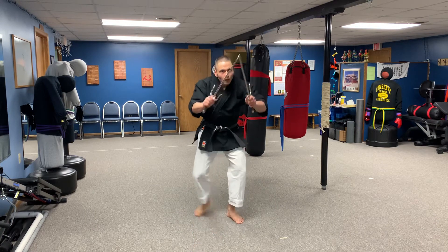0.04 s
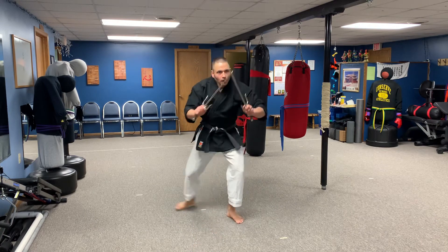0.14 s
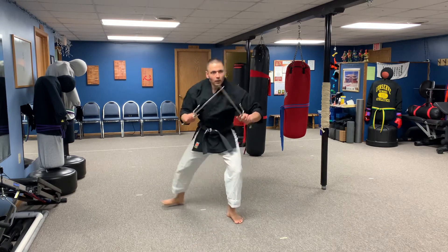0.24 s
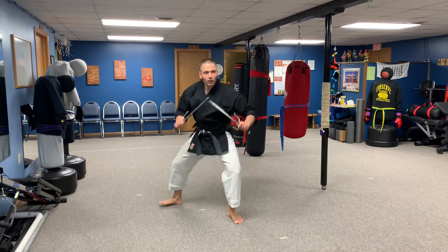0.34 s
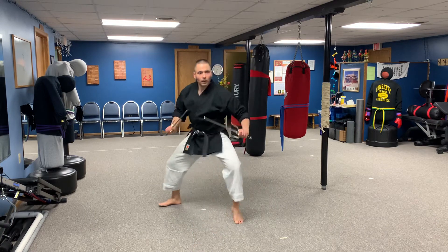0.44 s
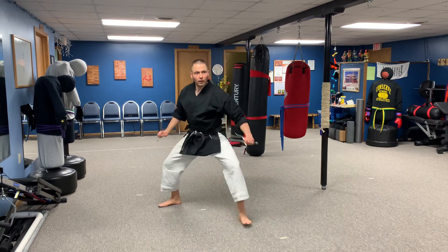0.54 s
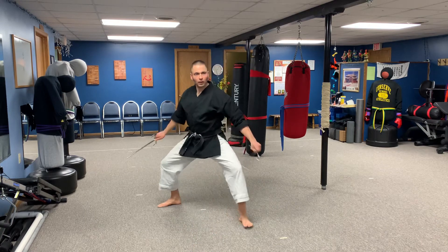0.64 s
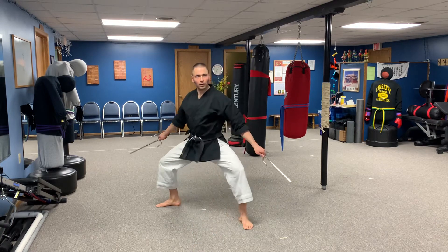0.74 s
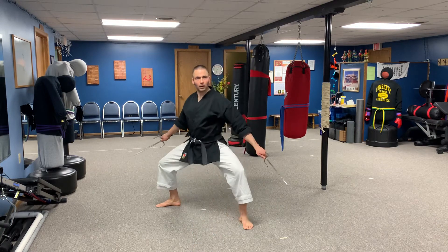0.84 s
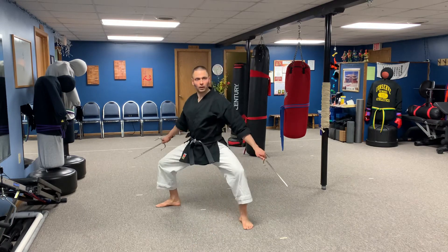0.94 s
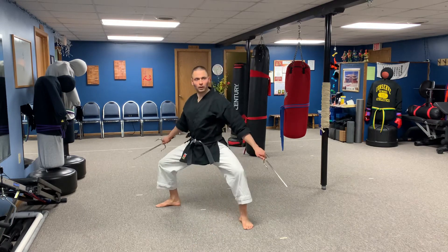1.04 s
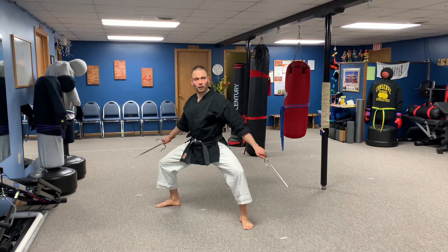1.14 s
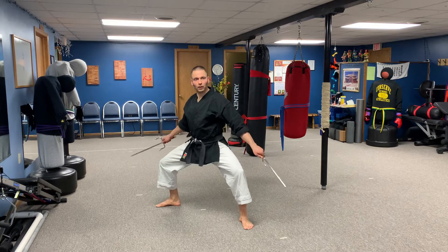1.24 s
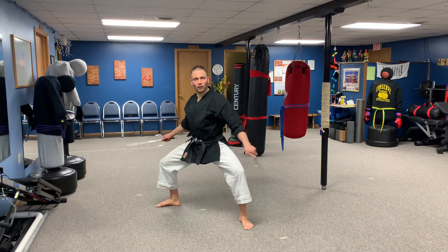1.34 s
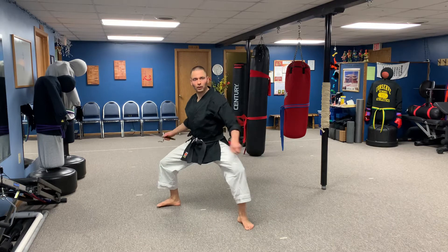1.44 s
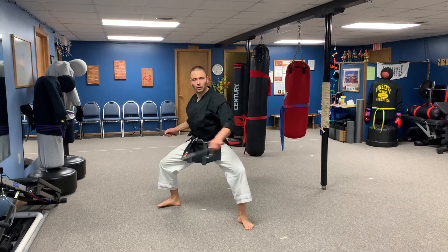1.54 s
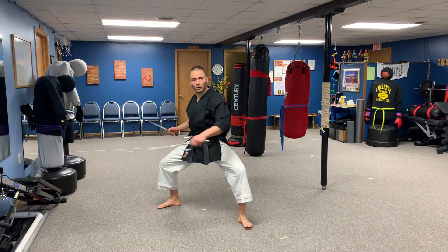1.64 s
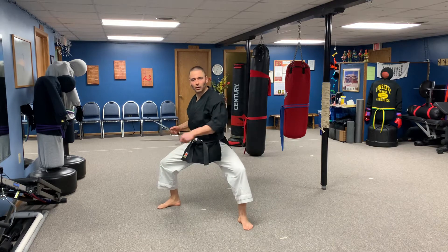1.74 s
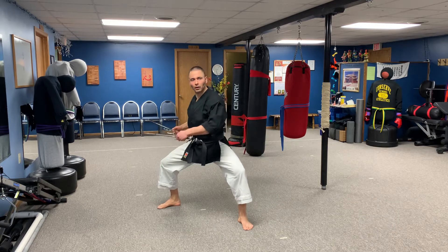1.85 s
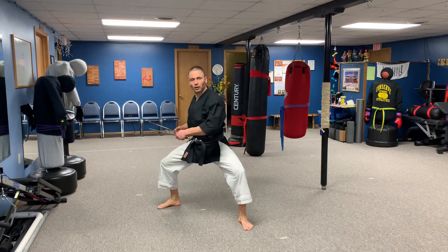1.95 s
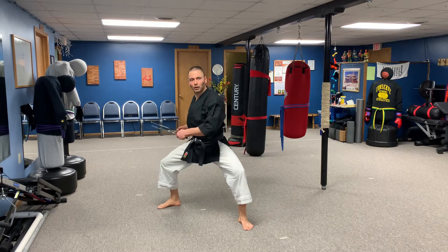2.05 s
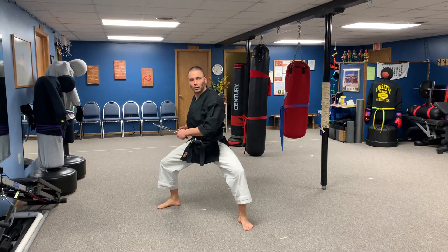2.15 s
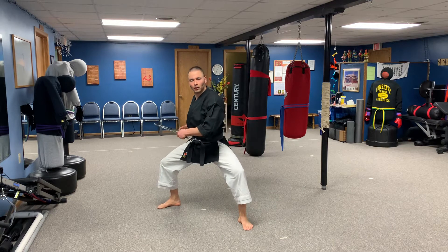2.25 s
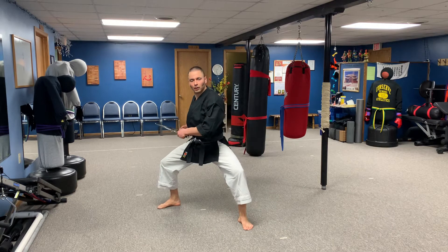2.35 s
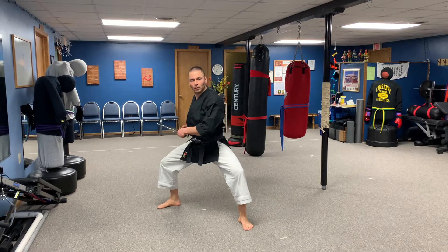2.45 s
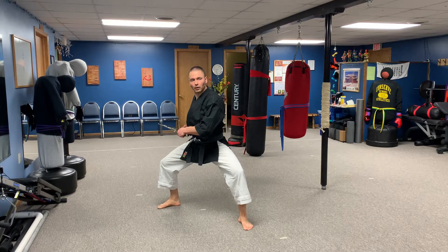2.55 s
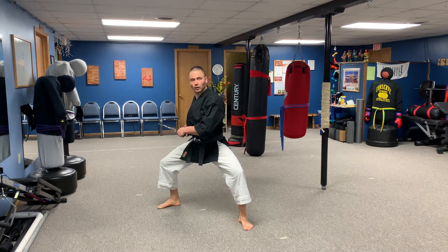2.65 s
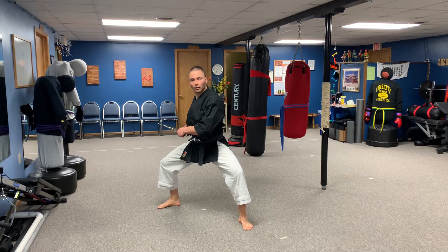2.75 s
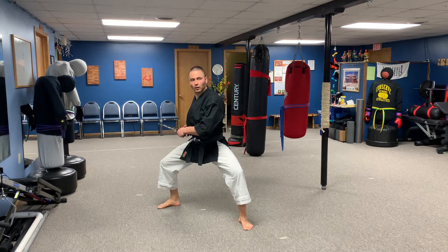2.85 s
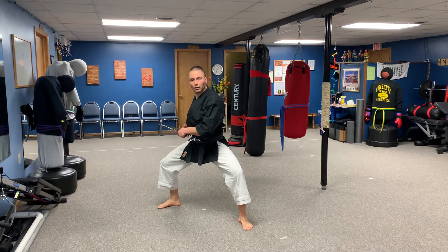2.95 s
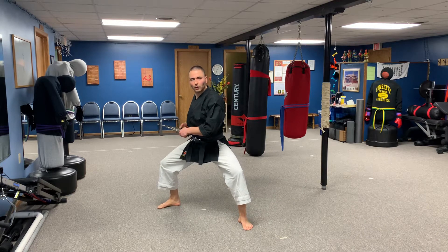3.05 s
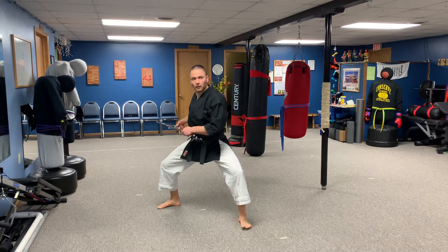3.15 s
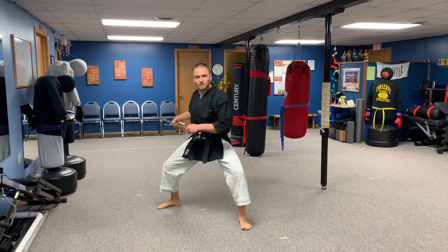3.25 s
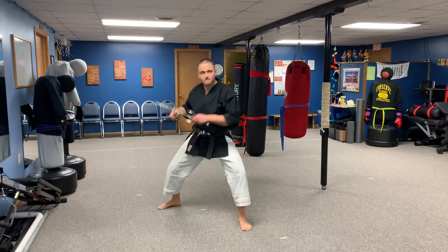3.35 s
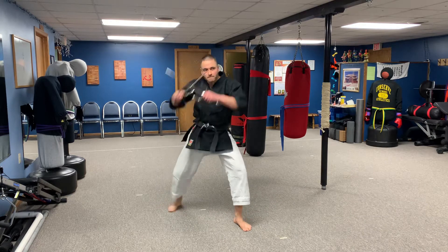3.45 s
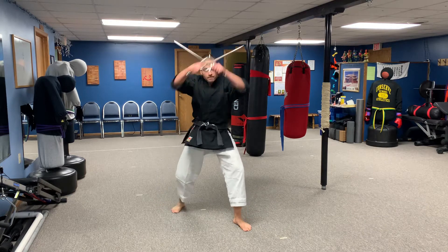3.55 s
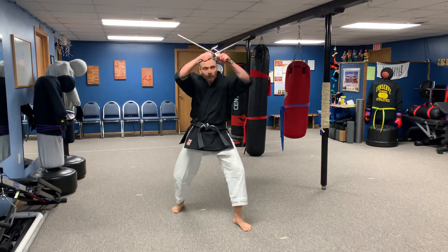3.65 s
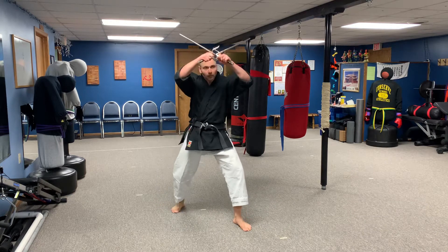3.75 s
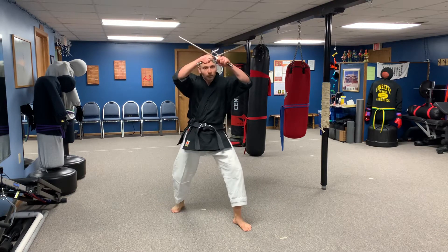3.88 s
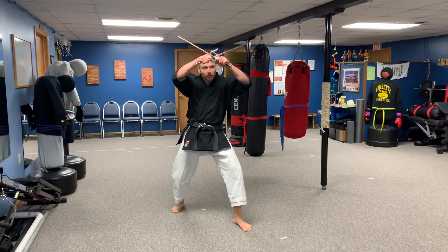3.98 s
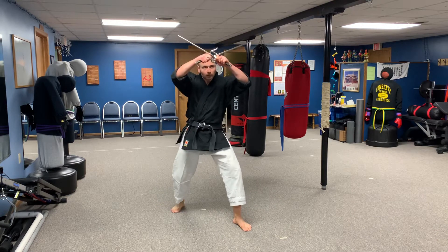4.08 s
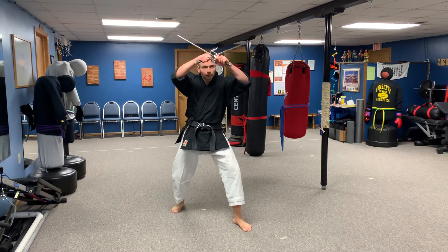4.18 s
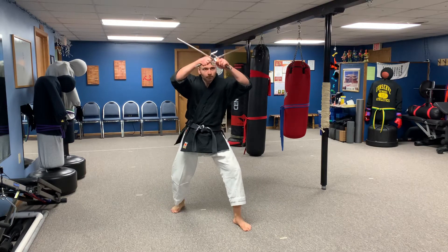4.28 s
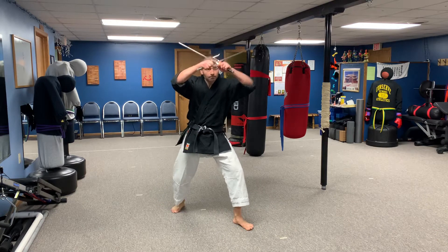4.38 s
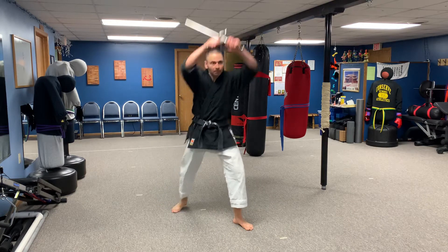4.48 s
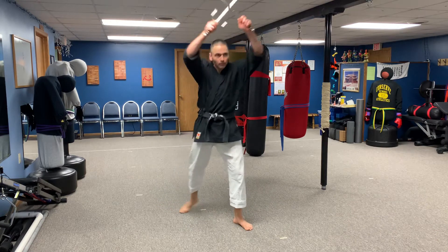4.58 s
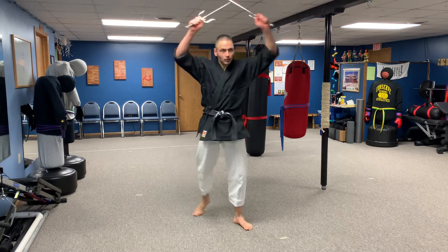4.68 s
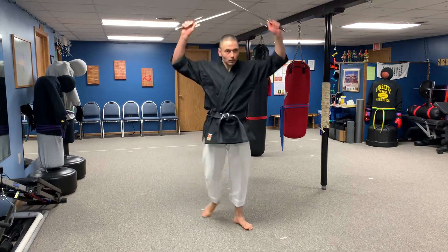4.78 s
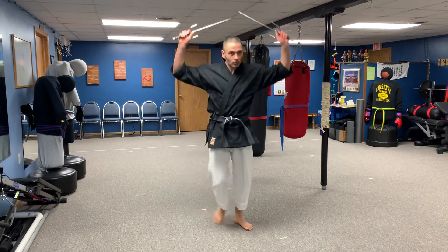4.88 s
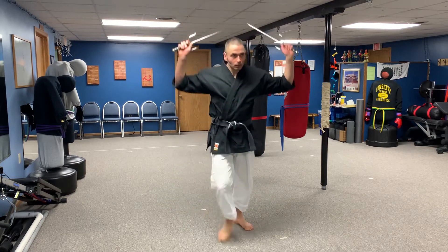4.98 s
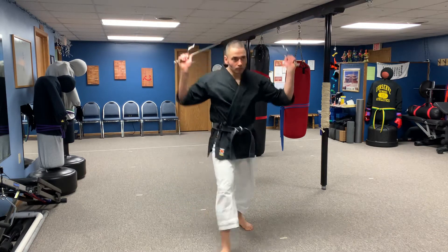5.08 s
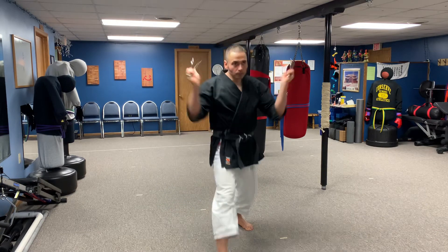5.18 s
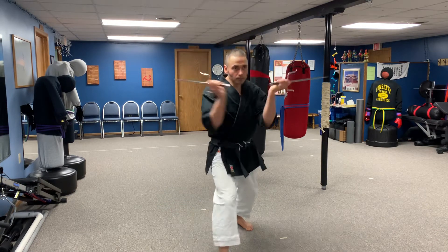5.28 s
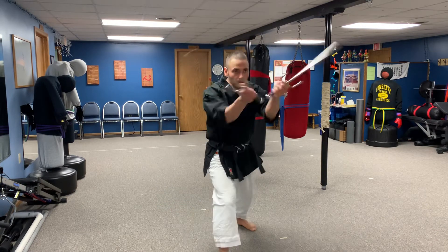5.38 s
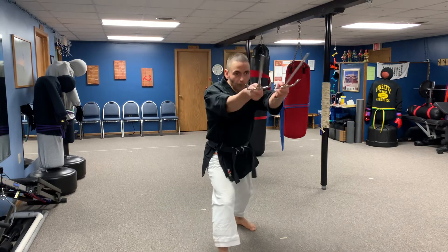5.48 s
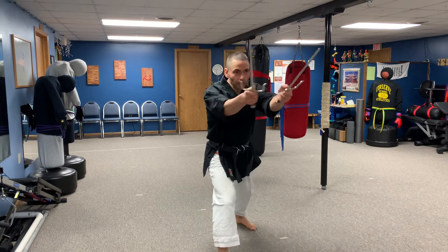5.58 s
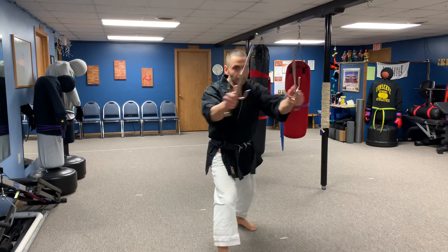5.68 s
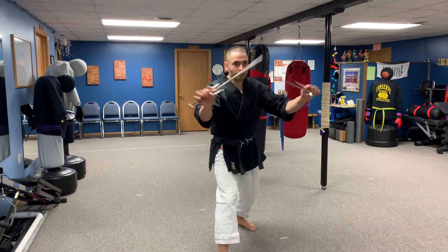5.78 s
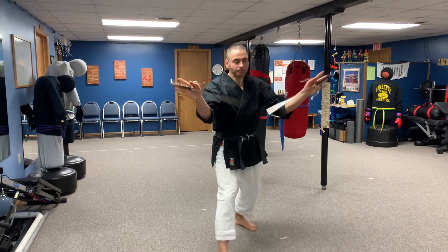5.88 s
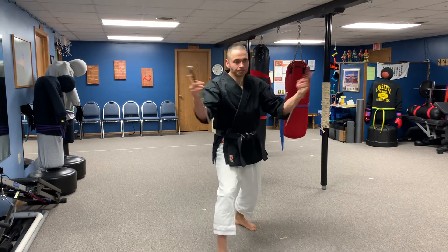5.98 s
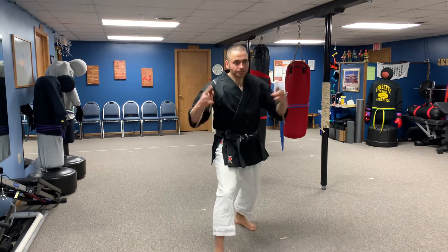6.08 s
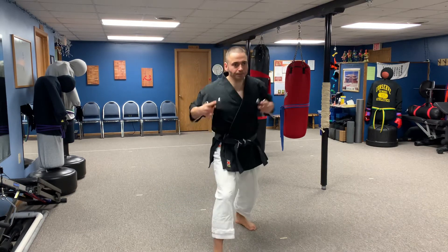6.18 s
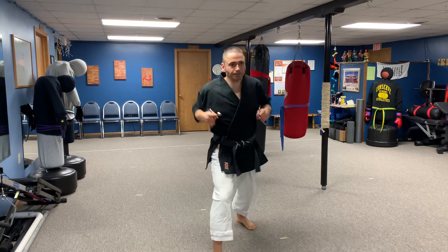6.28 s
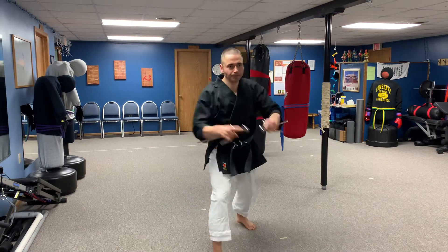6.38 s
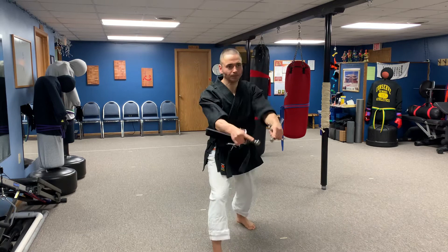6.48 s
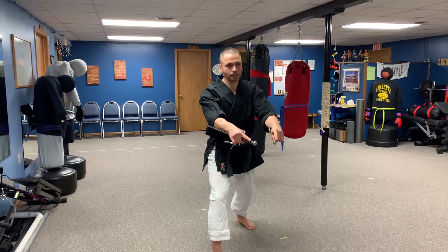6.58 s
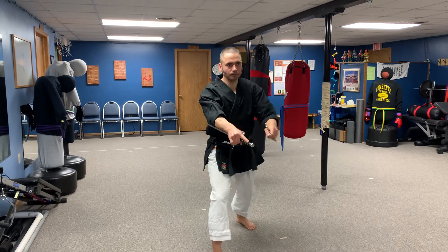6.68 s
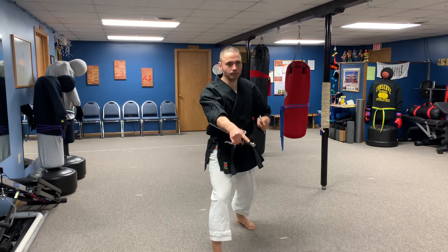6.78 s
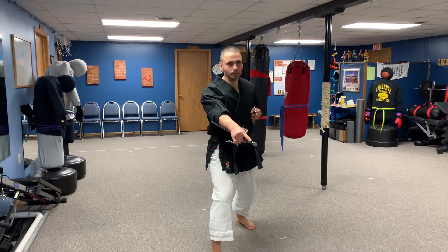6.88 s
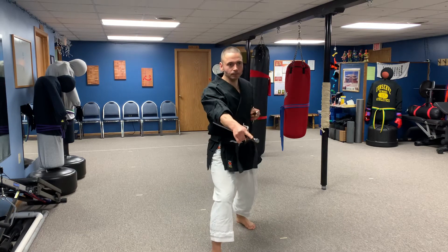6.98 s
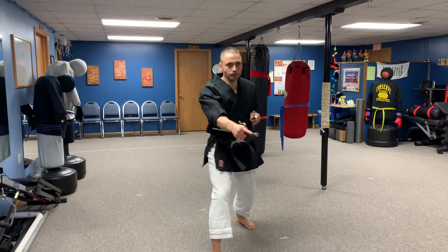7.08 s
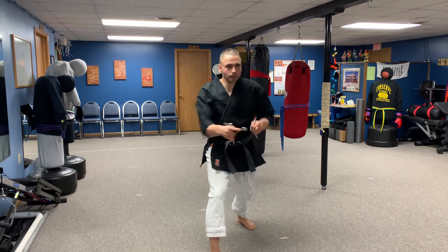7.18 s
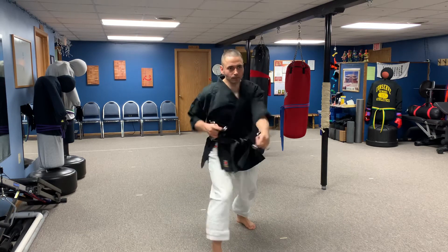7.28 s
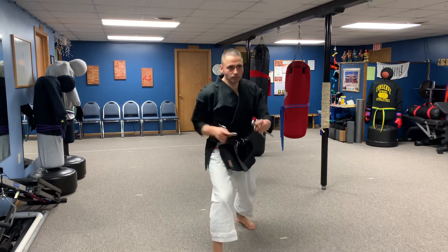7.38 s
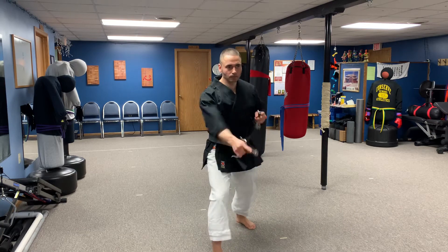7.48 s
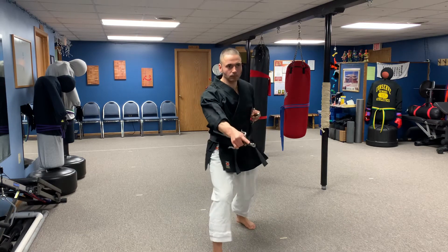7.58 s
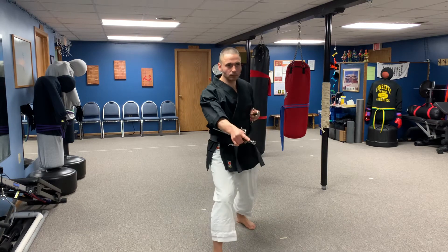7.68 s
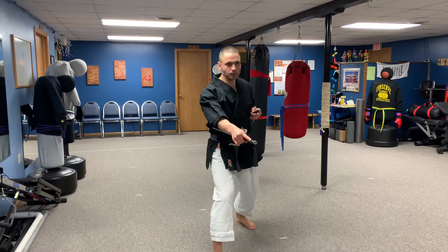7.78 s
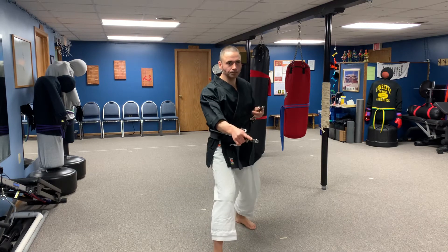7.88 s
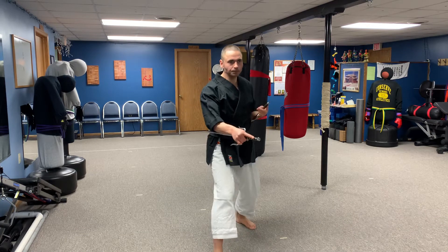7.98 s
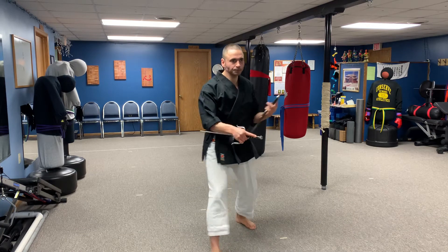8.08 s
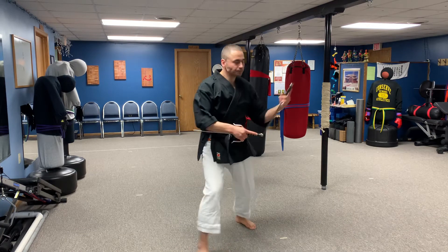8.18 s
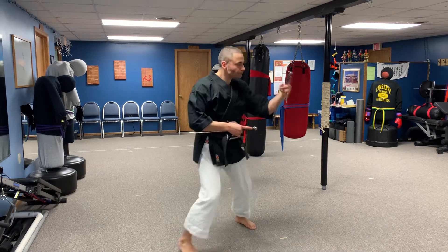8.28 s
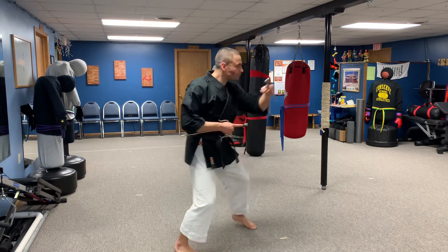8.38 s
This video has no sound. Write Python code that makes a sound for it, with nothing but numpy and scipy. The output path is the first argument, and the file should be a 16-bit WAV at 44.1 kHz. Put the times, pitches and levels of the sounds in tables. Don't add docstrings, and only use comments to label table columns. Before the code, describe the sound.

A carpeted training hall with low ventilation hum, heard from a phone a few metres away. A heavy cotton suit rustles and bare feet thud softly. Two steel prongs tap lightly together, then scrape upward into a sharp, bright clash with a short thin ring. Moments later they rasp apart with another ringing clink. The rest is brushing sleeves, flapping cloth, taut snaps and small grip ticks.

```python
import sys
import numpy as np
from scipy import signal
from scipy.fft import rfft, irfft
from scipy.io import wavfile
from scipy.ndimage import uniform_filter1d

SR = 44100
rng = np.random.default_rng(int(sys.argv[2]) if len(sys.argv) > 2 else 0)


def boost_factor(decibels):
    exponent = np.asarray(decibels, float) / 20
    return 10 ** exponent


def inscribe(sig):
    pcm = np.round(np.clip(np.atleast_2d(sig).T, -1, 1) * 32767)
    wavfile.write(sys.argv[1], SR, pcm.astype(np.int16))


N = 371763
TIME_S = np.arange(N) / SR
HZ = np.arange(N // 2 + 1) * SR / N


def colour(x, table):
    hz, db = np.transpose(table)
    return irfft(rfft(x) * boost_factor(np.interp(np.log(HZ + 1), np.log(hz), db)), N)


def unit(x):
    return x / np.sqrt(np.mean(x ** 2))


def envelope(rows):
    s, db = np.transpose(rows)
    outside_s = np.clip(s[0] - TIME_S, 0, 1) + np.clip(TIME_S - s[-1], 0, 1)
    return boost_factor(np.interp(TIME_S, s, db) - 360 * outside_s)


def swells(rows, fade_s):
    t = np.arange(0, N, 32) / SR
    gain = 0
    for s, db, swell_s, hold_s in rows:
        rise_db = 20 * np.clip(s - t, 0, 1) / swell_s
        fall_db = 20 * np.clip(t - s - hold_s, 0, 1) / fade_s
        gain = gain + boost_factor(db - rise_db - fall_db) * (abs(t - s) < 1)
    return np.interp(TIME_S, t, gain)


def walk(rate_hz):
    k = max(int(SR / rate_hz), 2)
    held = np.repeat(rng.standard_normal(N // k + 1), k)
    return 1.3 * uniform_filter1d(uniform_filter1d(held, k), k)[:N]


def grains(spread_db):
    return unit(rng.standard_normal(N) * boost_factor(spread_db * rng.exponential(size=N)))


def ring(x, hz, t60):
    r, w = np.exp(-np.log(1000) / (t60 * SR)), 2 * np.pi * hz / SR
    return signal.lfilter([0, r * np.sin(w)], [1, -2 * r * np.cos(w), r ** 2], x)


def kicks(rows):
    out = np.zeros(N)
    for s, db in rows:
        out[int(s * SR)] = boost_factor(db)
    return out


def bursts(rows, decay_s):
    r = np.exp(-1 / (decay_s * SR))
    swell = signal.lfilter([(1 - r) * np.e], [1, -2 * r, r ** 2], kicks(rows))
    return swell * rng.standard_normal(N)


def pings(rows, cycles, swell_s=1e-4):
    out = np.zeros(N)
    for s, db, hz in rows:
        start = int(s * SR)
        t = np.arange(min(SR, N - start)) / SR
        decay = np.exp(-t * hz / cycles) * (1 - np.exp(-t / swell_s))
        out[start:start + len(t)] += boost_factor(db) * np.sin(2 * np.pi * hz * t) * decay
    return out


# f/Hz, T60/s, level/dB
ECHO_BANDS = [(200, 0.6, 0), (1500, 0.33, 0), (4000, 0.33, 0), (7000, 0.2, -5), (12000, 0.07, -6)]


def room(x, wet_db):
    t, tails = np.arange(SR // 2) / SR, 0
    for hz, t60, db in ECHO_BANDS:
        edges = signal.butter(2, [hz / 2.5, min(hz * 2., .45 * SR)], "bandpass", fs=SR, output="sos")
        band = signal.sosfilt(edges, rng.standard_normal((2, len(t))))
        tails = tails + band * boost_factor(db - 60 * t / t60)
    tails = tails * np.clip(t / 0.002, 0, 1)
    tails = tails * boost_factor(wet_db) / np.sqrt(np.mean(np.sum(tails ** 2, axis=1)))
    return signal.fftconvolve(x[None], tails, axes=1)[:, :N] + x


# f/Hz, density/(dB per Hz)
AIR_COLOUR = [(19, -34), (30, -13), (60, -5), (110, 1), (190, -5), (260, -10), (400, -14.5), (700, -25),
              (1400, -31.5), (3000, -34.5), (6000, -41), (9000, -35), (12000, -37), (14500, -44),
              (16000, -48.5)]
# f/Hz, width/Hz, level/dB
HUM_LINES = [(117, 14, -68), (243.6, 10, -71.5), (11380, 30, -98.5)]


def hall():
    air = unit(colour(rng.standard_normal((2, N)), AIR_COLOUR)) * boost_factor(-67.5 + 1.2 * walk(2.3))
    hum = 0
    for hz, width_hz, db in HUM_LINES:
        hum = hum + boost_factor(db) * unit(ring(rng.standard_normal((2, N)), hz, 6.6 / width_hz))
    return air + hum


# t/s at full speed, level/dB, swell/(s per 20 dB), hold/s
STROKES = [(0.0, -64.5, .1, .1), (0.28, -76, .1, .16), (0.466, -64, .03, .005), (0.66, -70, .04, .06),
           (0.8, -80, .1, .04), (1.38, -77, .04, .045), (1.5, -85, .1, .15), (4.25, -83, .1, .1),
           (4.416, -69, .04, .003), (4.78, -57, .055, .08), (4.95, -62, .06, .02), (5.13, -61, .1, .004),
           (5.19, -68, .1, .19), (5.71, -66, .04, .004), (5.68, -80, .4, .15), (5.88, -58, .03, .08),
           (6.07, -72, .1, .13), (6.32, -68, .08, .05), (6.41, -64, .1, .03), (6.72, -75, .16, .16),
           (7.2, -65, .2, .04), (7.25, -57, .02, .003), (7.38, -52, .05, .004), (7.43, -68, .05, .07),
           (7.6, -84, .1, .35), (8.07, -59.5, .06, .18), (8.378, -58, .01, .003), (8.42, -66, .05, .01)]
# f/Hz, density/(dB per Hz)
BRUSH_COLOUR = [(300, -26.5), (1200, -10.5), (2200, 0), (4000, -2), (6000, -5.5), (7400, -5.5), (8700, -1),
                (10500, -10), (13500, -11.5), (16000, -27.5)]


def brushing():
    hiss = np.array([unit(colour(grains(2.4), BRUSH_COLOUR)) for _ in range(2)])
    return hiss * boost_factor(1.8 * walk(25) + 1) * swells(STROKES, fade_s=.085)


# t/s at full swing, level/dB, swell/(s per 20 dB), hold/s
MOVES = [(0.09, -66, .15, 0.003), (0.25, -65, .1, .13), (0.45, -70, .2, .05), (0.65, -71, .12, .04),
         (0.74, -65, .1, .07), (1.39, -74, .1, .02), (1.52, -81, .1, .2), (1.93, -82, .1, .02),
         (4.42, -66, .03, .03), (2.2, -77, .3, .07), (3.25, -70, .35, .05), (3.38, -59, .07, .005),
         (3.44, -65, .1, .08), (3.55, -49, .05, .035), (4.5, -58, .1, .05), (4.81, -65, .25, .28),
         (5.2, -54, .08, .01), (5.29, -60.5, .1, .13), (5.6, -77, .2, .2), (6.02, -64, .2, .08),
         (6.13, -59, .1, .02), (6.41, -47.5, .17, .015), (6.7, -66, .02, .03), (6.78, -61, .06, .09),
         (7.06, -65, .05, .06), (7.25, -48, .13, .03), (7.37, -50, .08, .13), (8.12, -66, .2, .1),
         (7.16, -58, .02, .04), (8.36, -62, .15, .07)]
# f/Hz, density/(dB per Hz)
FLAP_COLOUR = [(100, -29.5), (200, -9), (400, 0.5), (700, -1), (1200, -6.5), (2200, -13), (4000, -26),
               (7000, -36), (12000, -43)]


def flapping():
    lumps = boost_factor(2.3 * walk(30) - .3)
    move = swells(MOVES, fade_s=.125) + boost_factor(-91)
    flap = np.array([unit(colour(grains(2.3), FLAP_COLOUR)) for _ in range(2)])
    folds = ring(rng.standard_normal((2, N)), 190, 0.013)
    sway = unit(colour(folds, [(20, -12), (50, 0), (260, 0), (600, -5)]))
    return lumps * (flap * move + sway * boost_factor(-31) * move ** .5)


# t/s, peak/dB, f/Hz
SNAPS = [(0.083, -48, 600), (0.227, -44, 520), (0.3, -39, 480), (2.003, -52, 620), (5.188, -41, 507),
         (5.351, -42, 433), (6.132, -36, 640), (6.316, -41, 715), (6.382, -37, 665), (6.419, -36, 527),
         (6.691, -50, 506), (6.773, -42.5, 765), (7.153, -42, 670), (7.246, -41, 646), (7.361, -33.5, 1115),
         (7.433, -37, 770), (8.18, -43, 480), (6.87, -49, 1500), (0.2, -54, 500)]
# t/s, peak/dB, f/Hz
MORE_SNAPS = [(0.164, -60, 452), (0.26, -56, 638), (0.334, -53, 452), (0.766, -58, 732), (0.801, -59, 482),
              (6.817, -48, 1160), (7.03, -59, 506), (7.055, -53, 1140), (7.099, -53, 1200), (7.182, -42, 519),
              (7.195, -40, 528), (7.267, -37, 487), (7.277, -37, 452), (7.37, -38, 982), (7.384, -38, 921),
              (7.456, -39, 1110), (7.475, -39, 525), (7.496, -46, 482)]


def snaps():
    folds = SNAPS + [(s, db - 1.5, hz) for s, db, hz in MORE_SNAPS]
    puffs = bursts([(s, db) for s, db, hz in folds], 0.0015)
    return pings(folds, cycles=2.5) * boost_factor(0.5) + boost_factor(3) * colour(puffs, FLAP_COLOUR)


# t/s, peak/dB, f/Hz
STEPS = [(0.297, -54, 74.3), (0.607, -45.5, 70.0), (0.659, -45.5, 87), (5.249, -48, 60),
         (6.393, -45.5, 101.5), (7.3, -48, 55), (7.4, -54, 103)]


def footfalls():
    return pings(STEPS, cycles=1.1) * boost_factor(3.5)


# t/s, peak/dB, f/Hz
TICKS = [(1.43, -41, 8800), (5.131, -41, 2510), (5.716, -42.5, 5940), (7.86, -66, 5250), (8.376, -36, 6670)]
# f/Hz, density/(dB per Hz)
CRACK_COLOUR = [(120, -46.5), (300, -32), (500, -28.5), (1000, -18), (1600, -4), (2500, 1.5), (4000, -0.5),
                (6000, -0.5), (8500, 5), (11000, 0), (14000, -1), (16000, -24)]


def ticks():
    puffs = bursts([(s, db) for s, db, hz in TICKS], .0006)
    return pings(TICKS, cycles=4.8) * boost_factor(-2.5) + boost_factor(-8) * colour(puffs, CRACK_COLOUR)


def strike(force, hz, t60):
    out, busy = np.zeros(N), slice(2 * SR, 6 * SR)
    tone = ring(force[busy], hz, t60) * .1 / t60 * rng.choice([-1, 1])
    fill_s = .012 * (5000 / hz) ** .9
    out[busy] = ring(tone, hz, fill_s) * 2 * np.log(1000) / (fill_s * SR)
    return out


# t/s, peak/dB
CLASHES = [
    [(2.119, -66), (2.13, -59), (2.1405, -36), (2.1435, -33), (2.2378, -35.5), (2.2714, -41)],
    [(3.536, -36), (3.5457, -13.5), (3.5497, -15), (3.563, -29), (3.577, -29)],
    [(4.4573, -50), (4.474, -47), (4.4885, -38), (4.4947, -16.5), (4.5434, -26.5)],
]
# t/s, level/dB
SLIDES = [
    [(3.05, -83), (3.108, -71.5), (3.238, -75), (3.272, -61), (3.478, -41.5), (3.49, -40.5), (3.526, -52),
     (3.535, -36.5)],
    [(4.51, -36.5), (4.526, -31.5), (4.672, -42), (4.678, -44), (4.714, -42.5), (4.74, -57)],
]
# f/Hz, T60/s, level/dB at hip, overhead, apart
SAI_MODES = [(1571, 0.07, -16, -6, -18), (1744, 0.03, -8.5, -8.5, -15.5), (1948, 0.07, -24, 1.5, -14),
             (2164, 0.07, -10, -17, -10.5), (2367, 0.03, -3, -5.5, -10), (2659, 0.022, -17, -17.5, -10),
             (3251, 0.03, -10.5, -6, -4.5), (4430, 0.03, -2.5, -12.5, -10), (5720, 0.03, -5, -4, -18),
             (5824, 0.03, -2, -7, -18), (6707, 0.03, -11, -11, -14), (6912, 0.07, 3.5, -3, -6),
             (7310, 0.07, 0.5, -5.5, -10.5), (7454, 0.07, -13, -2, -4),
             (7773, 0.07, -28, -2, -15), (8010, 0.03, -35, -9, -26.5), (8441, 0.03, 0, -6, -13),
         (8591, 0.07, -28, 1.5, -4), (8900, 0.07, -9, -5, -15), (9173, 0.03, -22, -5.5, -32),
         (9313, 0.07, -1, -5.5, -18), (10217, 0.03, -12, -7.5, -20), (11208, 0.03, -37, -9, -22),
         (11380, 0.03, -25, -4.5, -15), (12015, 0.03, -28, -20, -13), (12801, 0.03, -50, -14.5, -38),
         (13329, 0.07, -5, -10, -13), (13641, 0.07, -3, -16, -31),
             (13985, 0.05, -1, 3, -12), (2530, 0.049, -22, -12.5, -12.5), (3456, .05, -3, -5.5, -7.5),
        (4570, 0.05, -5.5, -5, -6.5), (7021, .04, 0, -7.5, -19), (1000, 0.0098, -35, -14.5, -28.5),
        (1700, .04, -11, -6.5, -13.5), (10350, 0.034, -10, -9, -17), (11700, 0.037, -8, -10, -15),
        (1587, .05, -14.5, -6, -18), (2300, 0.032, -16, -13.5, -13.5), (15400, .03, -19, -8, -18)]


def steel(grit):
    hip, overhead, apart = (kicks(rows) for rows in CLASHES)
    rise, draw = (envelope(rows) * grit for rows in SLIDES)
    force = np.array([boost_factor(-17) * hip,
                      boost_factor(-18.5) * overhead + boost_factor(-56.5) * rise,
                      boost_factor(-17.5) * apart + boost_factor(-37) * draw])
    return sum(strike(boost_factor(db) @ force, hz, t60) for hz, t60, *db in SAI_MODES)


# f/Hz, T60/s, level/dB
BENDS = [(950, .005, 4), (1600, .012, -6), (2420, .012, -4), (3250, .012, -4), (4650, .01, 2),
         (5750, .012, 1), (7200, .007, -1), (8900, .007, 0), (10300, .007, -5), (11500, .006, -5),
         (13900, .01, -4), (15400, .01, -4)]


def bent(x):
    out = boost_factor(-3.5) * x
    for k, (hz, t60, db) in enumerate(BENDS):
        out = out + boost_factor(db) * ring(x, hz, t60) * 2 * np.log(1000) / (t60 * SR) * (-1) ** k
    return out


def crack(grit):
    hip, overhead, apart = (bursts(rows, 0.002) for rows in CLASHES)
    rise, draw = (envelope(rows) * grit for rows in SLIDES)
    light = boost_factor(-6.5) * hip + boost_factor(-2.5) * apart + boost_factor(-8.5) * draw
    thin = signal.butter(3, 1250, "highpass", fs=SR, output="sos")
    burst = bent(signal.sosfilt(thin, light) + boost_factor(3) * overhead)
    return colour(burst + boost_factor(-7.5) * rise, CRACK_COLOUR)


# t/s, level/dB, f/Hz, T60/s
PRONGS = [(2.145, -58, 7560, 1.1), (2.24, -59, 4720, .45), (2.24, -58, 2440, .5), (2.24, -60, 3400, .5),
          (3.075, -80, 3720, .3), (3.08, -78, 4560, .5), (3.1, -80, 4330, .2), (3.272, -68, 5800, .5),
          (3.29, -69, 5640, .4), (3.375, -62, 7250, .12), (3.55, -37, 7555, .4), (3.55, -41, 7752, .3),
          (3.55, -40, 3425, .35), (4.497, -38, 7564, 1.0), (4.497, -47, 7775, .6), (4.925, -62, 4450, .15)]


def prongs():
    lines = 0
    for s, db, hz, t60 in PRONGS:
        lines = lines + pings([(s, db, hz)], cycles=hz * t60 / np.log(1000), swell_s=.012)
    return lines * boost_factor(1 + 3.5 * np.array([walk(35), walk(32)]))


# from f/Hz, to f/Hz, width/Hz, level/dB
PRESSED = [(1050, 1560, 220, -6), (1700, 2150, 280, -7), (2250, 2680, 280, -2), (2700, 3050, 350, -8),
           (3000, 3780, 300, -5), (4300, 4850, 280, -5), (5200, 5500, 400, -8), (5600, 6080, 350, -4),
           (6800, 7300, 600, -6), (8500, 8750, 800, -4)]
# t/s, share of climb
PRESSURE = [(3.05, .1), (3.251, 0.053), (3.31, .35), (3.379, 0.66), (3.44, .87), (3.53, 1.12)]


def scrape():
    push, out = np.interp(TIME_S, *np.transpose(PRESSURE)), 0
    for low_hz, high_hz, width_hz, db in PRESSED:
        hz = (low_hz + (high_hz - low_hz) * push) * (1 + 0.015 * walk(22))
        phase = 2 * np.pi * np.cumsum(hz) / SR
        reach_db = db - 10 * (1 - push) * low_hz / 5000 + 3.6 * walk(35)
        line = walk(.72 * width_hz) * np.cos(phase) + walk(.72 * width_hz) * np.sin(phase)
        out = out + boost_factor(reach_db) * line
    return out * envelope(SLIDES[0]) * boost_factor(-9.5)


def blades():
    grit = grains(2.5) * boost_factor(1.6 * walk(60))
    dry = steel(grit) + crack(grit) + scrape()
    place = np.digitize(TIME_S, (2.9, 4.3))
    return sum(room(dry * (place == k), wet_db) for k, wet_db in enumerate((0.5, -0.3, 0.3)))


# t/s, peak/dB
PARTING = [
    (4.6773, -30),
    (4.6959, -33),
]
# f/Hz, T60/s, level/dB at first touch, at second
TIPS = [(1558, 0.3, 0, -6), (2426, .25, -2, -6), (3253, 0.08, -6, -7), (4530, 0.15, -5, -2),
        (5860, 0.035, -4, -3), (6880, 0.035, -3, -6), (8800, 0.04, -4, 4), (10300, 0.045, -14, -7),
        (11820, 0.04, -10, -2), (13900, .04, -6, -3), (5500, .02, -13, -18), (7200, .03, -12, -7)]


def tips():
    force = np.array([kicks([row]) for row in PARTING])
    return boost_factor(-9) * sum(strike(boost_factor(db) @ force, hz, t60) for hz, t60, *db in TIPS)


def scene():
    suit = brushing() + flapping()
    knocks = room(snaps() + footfalls() + ticks(), wet_db=-0.7) * boost_factor(-4.0)
    sai = (blades() + room(tips(), wet_db=-3)) * boost_factor(-1.0)
    return hall() + suit + knocks + sai + prongs()


def band_limit(x):
    return signal.sosfilt(signal.butter(12, 16640, fs=SR, output="sos"), x)


# f/Hz, share heard alike (0-1), right port lead/rad
PORTS = [(0, .93, 0), (150, .88, 0), (400, .3, 0), (3500, .4, -1.1), (5000, .3, -1), (6300, .5, .1),
         (7500, .6, 1.3), (8000, .96, 3.0), (9000, .96, 3.3), (10500, .92, 6.1), (11700, .92, 6.5),
         (12800, .95, 9.3), (14400, .92, 9.7), (15100, .92, 12.5)]
# f/Hz, gain/dB
RIGHT_PORT = [(60, 0), (1400, -1.2), (3000, 0), (5500, 4), (7000, 0), (16000, 0)]
# f/Hz, gain/dB
TOP_END = [(60, 0), (15700, 0), (16100, -20)]


def record(dry):
    hz, alike, turn = np.transpose(PORTS)
    alike = np.clip(np.interp(HZ, hz, alike), 0, 1)
    turn = np.interp(HZ, hz, turn)
    left, right = rfft(dry)
    right = (alike * left + np.sqrt(1 - alike ** 2) * right) * np.exp(1j * turn)
    ports = np.array([irfft(left, N), colour(irfft(right, N), RIGHT_PORT)])
    return band_limit(colour(ports, TOP_END))


dry = scene()
out = record(dry)
inscribe(out)
```